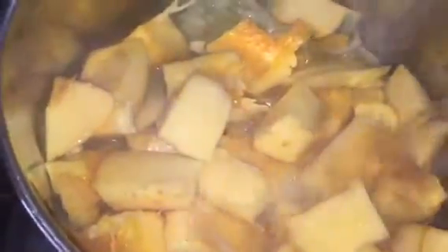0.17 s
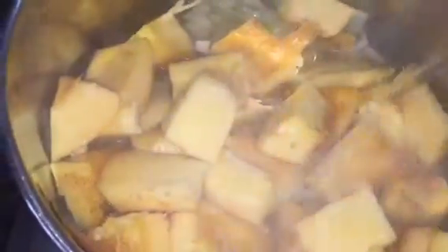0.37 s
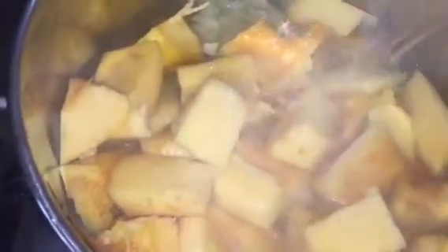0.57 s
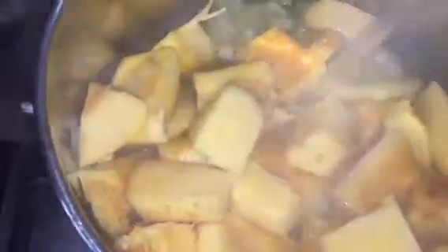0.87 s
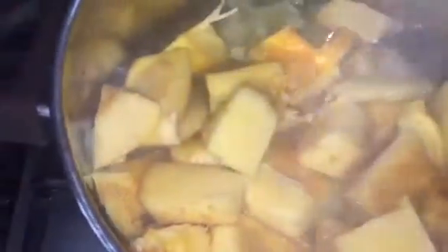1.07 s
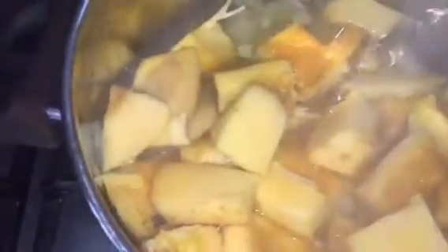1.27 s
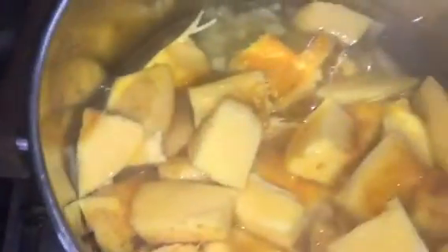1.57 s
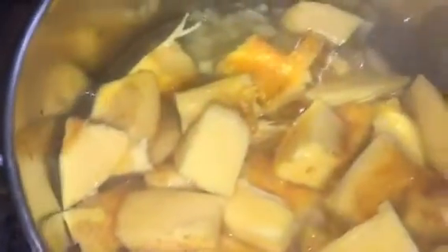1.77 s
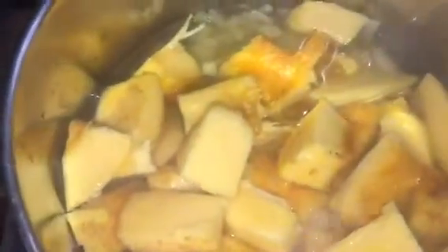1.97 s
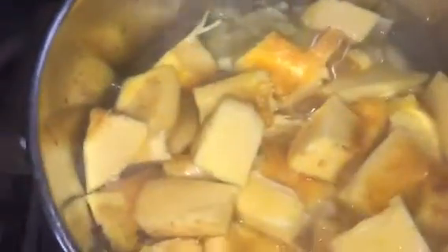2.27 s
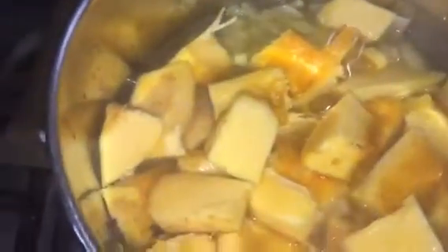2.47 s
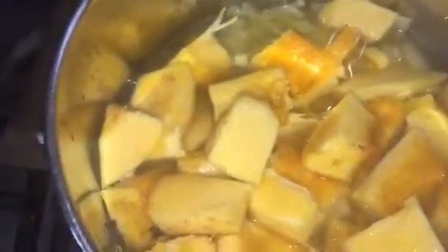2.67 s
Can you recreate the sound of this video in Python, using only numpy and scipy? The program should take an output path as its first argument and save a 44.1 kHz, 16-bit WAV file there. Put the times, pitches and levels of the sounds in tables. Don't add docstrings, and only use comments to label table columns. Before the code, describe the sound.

Hot water pours in a broken stream onto vegetables in a steel pot, crackling, spattering and plopping, then only drips; a kettle thuds down and knocks loudly on the counter. Close small microphone, quiet kitchen.

```python
import sys
import numpy as np
from scipy import signal
from scipy.fft import rfft, irfft
from scipy.io import wavfile

SR = 44100
rng = np.random.default_rng(int(sys.argv[2]) if len(sys.argv) > 2 else 0)


def how_loud(loudness_db):
    steps = np.asarray(loudness_db, float) / 20
    return 10 ** steps


def to_wav(s):
    ch = np.atleast_2d(s).T
    pcm = np.round(np.clip(ch, -1, 1) * 32767)
    wavfile.write(sys.argv[1], SR, pcm.astype(np.int16))


N = 123479
AGE_S = np.arange(2600) / SR

# time in seconds, crackle level in dB, gurgle relative to it in dB.
POUR_VIGOUR = [(0, -74.5, 11.5), (.03, -63, -10), (.08, -53.5, -1), (.15, -62, 1), (.18, -73.5, -3),
               (.215, -55.5, -14), (.26, -83, 9), (.31, -52.5, -13), (.42, -56, -4.5), (.57, -63.5, 1.5),
               (.64, -59, -2), (.70, -59.5, 7.5), (.75, -70.5, 22), (.80, -66, 6.5), (.94, -65, 10),
               (1.10, -49.5, 0.5), (1.165, -73.5, 11.5), (1.42, -81, -35), (1.55, -80, -32)]
# frequency in Hz, density in dB per Hz.
SPRAY_COLOUR = [(1500, 3.5), (2300, 6), (3800, -3.5), (5500, -20.5), (6600, -45.5), (8000, 3.5),
                (11000, 3.5), (16000, 8)]
# start in seconds, peak in dB, ring in Hz.
SNAP_EVENTS = [(0.0314, -41, 10700), (0.058, -38, 6100), (0.069, -34, 6440), (0.086, -32.5, 8440),
               (0.1341, -33, 6860), (0.3042, -34, 8060), (0.389, -23.5, 5660), (0.5292, -30, 6000),
               (0.609, -37, 6500), (0.624, -26, 6960), (0.6433, -23.5, 6950), (0.6658, -33, 5860),
               (0.6843, -25.5, 5050), (0.8074, -25.5, 6830), (0.8258, -32, 6200), (0.8448, -35, 5800),
               (0.857, -33, 5840), (0.8834, -30.5, 11300), (0.9093, -32.5, 6000), (0.9221, -26, 9300),
               (0.9562, -24, 8400), (0.981, -14, 9300), (0.9959, -20, 11400), (1.006, -41, 9000),
               (1.0225, -13.5, 10560), (1.054, -30.5, 4530), (1.072, -15, 9100), (1.089, -21, 11700),
               (1.102, -15.5, 8700), (1.116, -15.5, 9100)]
# start in seconds, peak
# in dB, ring in Hz.
SPATTER_EVENTS = [(.052, -37.5, 8350), (.063, -31.5, 8260), (.076, -37, 6200), (.125, -50, 7500),
                  (.192, -42, 8900), (.2019, -41, 8160), (.2129, -61, 5730), (.223, -38.5, 7400),
                  (.2778, -52, 6090), (.2907, -46, 5940), (.332, -44, 7000), (.3641, -58, 6470),
                  (.3775, -37, 6500), (.4105, -29.5, 6000), (.428, -51, 6500), (.4354, -34, 6600),
                  (.4499, -37, 6800), (.4668, -55, 6500), (.4893, -50, 6490), (.5077, -37, 12900),
                  (.5467, -32, 6360), (.5871, -38, 5460), (.5965, -37, 5500), (.7467, -45, 12800),
                  (.7801, -44, 13300), (.7956, -36, 11800), (.8964, -35, 8700), (.940, -32.5, 5000),
                  (.9487, -26, 9800), (1.003, -31, 10100), (1.017, -29, 9500), (1.0195, -20, 6500),
                  (1.035, -34, 4540), (1.040, -37.5, 4630), (1.084, -50, 9500), (1.097, -40, 14000),
                  (1.113, -23, 11700), (1.182, -31, 10500), (1.2277, -70, 6280), (1.241, -56, 4840),
                  (1.265, -53, 6000), (1.370, -52.5, 5430), (1.388, -47, 9100), (1.4433, -52, 13300),
                  (1.457, -62.5, 10000), (1.6019, -60, 4010), (1.756, -59, 2900), (1.805, -51, 5700),
                  (1.879, -44, 5070), (1.940, -56, 10050), (2.096, -59, 13000), (2.505, -44.5, 12500)]
# start in seconds, peak in dB, ring in Hz.
DRIP_EVENTS = [
    (1.1374, -19.5, 7650),
    (1.1787, -23.5, 7160),
    (1.273, -46.5, 13400),
    (1.379, -47, 9170),
    (1.566, -50.5, 11300),
    (1.8037, -52.5, 3180),
    (1.8716, -44, 6000),
    (1.874, -43, 4320),
    (1.9398, -53.5, 4400),
]
# start in seconds, peak in dB, ring in Hz.
TINK_EVENTS = [(0.0323, -40.5, 3350), (0.0571, -40.5, 1830), (0.205, -31, 2350), (0.214, -38, 1970),
               (0.223, -36.5, 2360), (0.3074, -42.5, 2420), (0.3232, -32, 2110), (0.388, -26, 2380),
               (0.7694, -35.5, 1820), (0.9816, -34, 2140), (0.9907, -26.5, 2410), (1.011, -31.5, 2270),
               (1.072, -25.5, 2230), (1.1184, -21.5, 2870)]
# start in seconds, peak in dB, ring in Hz.
PLOP_EVENTS = [(0.389, -32, 900), (0.608, -38, 1210), (0.667, -44, 1040), (0.687, -38, 1260),
               (0.753, -44.5, 1220), (0.808, -37, 1330), (0.896, -40.5, 1180), (0.95, -29.5, 944),
               (0.981, -20.5, 1286), (1.003, -30.5, 1230), (1.022, -24, 1270), (1.054, -23.5, 890),
               (1.089, -24, 1270), (1.105, -29.5, 1300), (1.115, -27.5, 1510)]
# frequency in Hz, level in dB, T60 in seconds.
POT_MODES = [(710, -12, .012), (1290, -7, .016), (2290, -11, .018), (3070, -14, .013), (4530, -18, .01)]
# start in seconds, peak in dB, boost of the high modes in dB.
CRACK_EVENTS = [
    (2.603, -5, 12.5),
    (2.6251, 0, 31),
    (2.6267, -3.5, -37),
    (2.6304, -2.5, 0.5),
    (2.638, -9.5, 5.5),
    (2.641, -23, 14),
    (2.679, -15, 3.5),
]
# frequency in Hz, level in dB, T60 in seconds.
KETTLE_MODES = [(2230, -11, 0.019), (2270, -2, 0.016), (2393, 15.5, 0.011), (2720, 9.5, 0.017),
                (3030, 3, 0.018), (3267, -5, 0.041), (5170, 6, 0.0057), (5540, 7, 0.0081),
                (6000, -2, 0.021), (6500, -10, 0.024), (8500, -1, 0.0086), (11600, -8, 0.014),
                (14000, 2, 0.0054)]
# start in seconds, level in dB, contact cut in Hz.
THUD_EVENTS = [
    (2.391, -25.5, 865),
    (2.402, -24.5, 620),
    (2.414, -21, 500),
    (2.445, -27.5, 446),
    (2.605, -25, 300),
    (2.625, -18.5, 520),
    (2.640, -18.5, 338),
    (2.688, -23.5, 235),
    (2.736, -30, 470),
    (2.762, -29, 355),
]
# frequency in Hz, level in dB, T60 in seconds.
COUNTER_MODES = [(128, -10, 0.043), (211, -11, 0.06), (261, -16, 0.06), (301, 0.5, 0.035), (449, -2, 0.038),
                 (626.5, -2.5, 0.052), (740, -35, 0.03)]
# time in seconds, level in dB.
SLIDE_LEVEL = [(2.47, -78.5), (2.495, -68), (2.51, -50), (2.56, -51.5), (2.602, -41.5), (2.61, -81)]
# frequency in Hz, density in dB per Hz.
SLIDE_SPECTRUM = [(500, -9.5), (1050, -9), (2300, -8.5), (3200, -23), (5000, -32.5), (9000, -28.5),
                  (11700, -33), (16000, -39)]
# start in seconds, peak
# in dB, frequency in Hz.
BUMP_EVENTS = [(0.576, -54.5, 66.5), (1.081, -50.5, 56), (1.127, -56, 59.5), (1.177, -56, 60.5),
               (1.618, -55.5, 79), (2.383, -22, 75.4), (2.459, -35.5, 110), (2.519, -39.5, 74),
               (2.6, -24.5, 73), (2.624, -21.5, 70), (2.675, -29, 109), (2.737, -30.5, 60)]
# frequency in Hz, T60 in seconds.
KITCHEN_T60 = [(60, 0.9), (300, 0.5), (1500, 0.44), (5000, 0.31), (14000, 0.29)]
# frequency in Hz, density in dB per Hz.
HUM_COLOUR = [(25, -8.5), (75, -1), (227, -10.5), (600, -15), (1100, -19), (2300, -19.5), (14000, -30),
              (16500, -31)]
# centre in Hz, width in Hz, level in dB.
WHISTLE_BANDS = [(2210, 340, -73), (4450, 300, -86.5), (645, 150, -78)]

CRACKLE_PER_S, SIZZLE_PER_S, GURGLE_PER_S = 2700, 900, 730
CRACKLE_DB, SIZZLE_DB, FIZZ_DB = 1, 3, -6.5
SNAP_SPAN, SPATTER_SPAN, DRIP_SPAN = (0.6, 2.2), (0.66, 2.03), (0.63, 1.67)
SNAP_SWELL_S, SNAP_T60_S = 0.0012, 0.0044
SNAP_RING_DB, SNAP_RING_CYCLES = -5, 44.4
SNAP_TAIL_DB, SNAP_TAIL_T60_S = -24, 0.045
TINK_CYCLES, PLOP_CYCLES = 32, 8
BUBBLE_RISE, BREATH_GAIN = 0.15, 0.63
POT_DELAY_S = 0.001058
BRIGHT_FROM_HZ = 4000
CRACK_NOISE_DB, CRACK_T60_S = -9, 0.0061
CRACK_WASH_DB, CRACK_WASH_T60_S = -3, 0.091
RATTLE_DB, RATTLE_T60_S, RATTLE_HZ = -6, 0.23, (780, 2560)
RATTLE_BRIGHT_DB = -29.5
SLOSH_DB, SLOSH_AT_S, SLOSH_WIDTH_S = -58, 1.052, 0.085
ROOM_WATER_DB, ROOM_KNOCK_DB, ROOM_GAP_S = -25, -10, 0.0072
HUM_DB = -67.5
HEADROOM = 0.88


def rms_one(x):
    return x / np.sqrt(np.mean(x ** 2) + 1e-20)


def peak_one(x):
    return x / np.abs(x).max()


def noise(size=N):
    return rng.standard_normal(size)


def in_time(rows):
    s, *columns = np.transpose(rows)
    return [np.interp(np.arange(N) / SR, s, c, left=-120, right=-120) for c in columns]


def at_hz(points, hz):
    points_hz, value = np.transpose(points)
    return np.interp(np.log(hz), np.log(points_hz), value)


def drift(rate_hz):
    r = np.exp(-80 * np.pi * rate_hz / SR)
    slow = signal.lfilter([1], [1, -2 * r, r * r], noise(N // 40 + 2002))[2000:]
    return np.interp(np.arange(N) / 40, np.arange(len(slow)), rms_one(slow))


def ring(clicks, hz, t60_s):
    r = how_loud(-60 / (t60_s * SR))
    w = 2 * np.pi * hz / SR
    return signal.lfilter([0, np.sin(w)], [1, -2 * r * np.cos(w), r * r], clicks + 1e-18)


def colour(x, spectrum):
    gain = how_loud(at_hz(spectrum, np.fft.rfftfreq(N, 1 / SR) + 1))
    return rms_one(irfft(rfft(x) * gain, N))


def band(x, low_hz, high_hz):
    edges_hz = [low_hz, min(high_hz, 0.45 * SR)]
    return signal.sosfilt(signal.butter(2, edges_hz, "band", fs=SR, output="sos"), x)


def add(out, start_s, burst):
    i = int(start_s * SR)
    out[i:i + len(burst)] += burst[:N - i]


def fade(t60_s):
    return how_loud(-60 * AGE_S / t60_s)


def grains(per_s, low_hz, high_hz, cycles, spread_db, count):
    sizes = how_loud(spread_db * np.minimum(rng.exponential(1, N), 5)) * rng.choice([-1, 1], N)
    clicks = sizes * (rng.random(N) < per_s / SR)
    dealt = rng.integers(0, count, N)
    out = np.zeros(N)
    for k, hz in enumerate(np.geomspace(low_hz, high_hz, count)):
        out += band(ring(clicks * (dealt == k), hz, cycles / hz), hz / 3.1, hz * 1.35)
    return rms_one(out)


def pour():
    level_db, gurgle_db = in_time(POUR_VIGOUR)
    clumps = how_loud(3.5 * drift(49))
    crackle = grains(CRACKLE_PER_S * clumps, 3110, 14200, cycles=7.3, spread_db=3.44, count=16)
    crackle = colour(crackle, SPRAY_COLOUR)
    sizzle = grains(SIZZLE_PER_S * clumps, 5900, 7000, cycles=50, spread_db=3.2, count=8)
    fizz = colour(noise(), SPRAY_COLOUR) * how_loud(3 * drift(80))
    gurgle_rate = GURGLE_PER_S * how_loud(5 * drift(30))
    gurgle = grains(gurgle_rate, 1050, 2600, cycles=17, spread_db=3, count=14)
    gurgle = band(gurgle, 350, 4100)
    spray = how_loud(CRACKLE_DB) * crackle + how_loud(SIZZLE_DB) * sizzle + how_loud(FIZZ_DB) * fizz
    return how_loud(level_db) * (spray + how_loud(gurgle_db) * gurgle)


def snaps(rows, span):
    low, high = span
    spit_fade = fade(SNAP_T60_S) + how_loud(SNAP_TAIL_DB) * fade(SNAP_TAIL_T60_S)
    swell = np.minimum(AGE_S / SNAP_SWELL_S, 1) ** 2
    out = np.zeros(N)
    for s, db, hz in rows:
        spit = band(noise(len(AGE_S)), low * hz, high * hz)
        spit = band(spit, 0.85 * low * hz, 1.3 * high * hz) * spit_fade
        tone = rms_one(band(noise(len(AGE_S)), 0.862 * hz, 1.05 * hz)) * fade(SNAP_RING_CYCLES / hz)
        add(out, s, how_loud(db) * peak_one((spit + how_loud(SNAP_RING_DB) * tone) * swell))
    return out


def bubbles(rows, cycles):
    out = np.zeros(N)
    for s, db, hz in rows:
        turns = hz * AGE_S * (1 + BUBBLE_RISE * hz * AGE_S / cycles)
        breath = rms_one(band(noise(len(AGE_S)), 0.61 * hz, 1.38 * hz))
        burst = np.sin(2 * np.pi * turns) + BREATH_GAIN * breath
        burst = burst * fade(cycles / hz) * np.minimum(AGE_S * hz, 1)
        add(out, s, how_loud(db) * peak_one(burst))
    return out


def pot():
    click = 1. * (AGE_S == 0)
    out = np.zeros(N)
    for s, db, _ in PLOP_EVENTS:
        body = np.zeros(len(AGE_S))
        for (hz, mode_db, t60_s), luck in zip(POT_MODES, noise(len(POT_MODES))):
            body += how_loud(mode_db + 3 * luck) * ring(click, hz * (1 + 0.048 * luck), t60_s)
        add(out, s + POT_DELAY_S, how_loud(db) * band(body, 370, 6300))
    return out


def cracks():
    click = 1. * (AGE_S == 0)
    out = np.zeros(N)
    for s, db, bright_db in CRACK_EVENTS:
        body = np.zeros(len(AGE_S))
        for (hz, mode_db, t60_s), luck in zip(KETTLE_MODES, noise(len(KETTLE_MODES))):
            body += how_loud(mode_db + 2.5 * luck + bright_db * (hz > BRIGHT_FROM_HZ)) * ring(click, hz, t60_s)
        body = peak_one(band(body, 1600, 9000))
        white = noise(len(AGE_S))
        spit = band(white, 3100, 9900) * fade(CRACK_T60_S)
        wash = band(white, 960, 3840) * fade(CRACK_WASH_T60_S)
        add(out, s, how_loud(db) * (body + how_loud(CRACK_NOISE_DB) * (spit + how_loud(CRACK_WASH_DB) * wash)))
    return out


def thuds():
    out = np.zeros(N)
    for s, db, cut_hz in THUD_EVENTS:
        push = np.zeros(SR // 2)
        push[0] = how_loud(db)
        push = signal.sosfilt(signal.butter(2, cut_hz, fs=SR, output="sos"), push)
        for (hz, mode_db, t60_s), luck in zip(COUNTER_MODES, noise(len(COUNTER_MODES))):
            add(out, s, how_loud(mode_db + 2 * luck) * ring(push, hz, t60_s))
    return out


def rattle():
    out = np.zeros(N)
    for s, db, cut_hz in THUD_EVENTS:
        white = noise(len(AGE_S))
        dull = band(band(white, *RATTLE_HZ), 230, RATTLE_HZ[1])
        bright = how_loud(RATTLE_BRIGHT_DB) * band(white, 4800, 8800)
        add(out, s, how_loud(db + RATTLE_DB) * cut_hz / 500 * (dull + bright) * fade(RATTLE_T60_S))
    return out


def slide():
    level_db, = in_time(SLIDE_LEVEL)
    return how_loud(level_db + 1.5 * drift(80)) * colour(noise(), SLIDE_SPECTRUM)


def bumps():
    swell = np.sin(np.pi * AGE_S / AGE_S[-1]) ** 2
    out = np.zeros(N)
    for s, db, hz in BUMP_EVENTS:
        add(out, s, how_loud(db) * np.sin(2 * np.pi * hz * AGE_S) * swell)
    return out


def slosh():
    swell = np.exp(-((np.arange(N) / SR - SLOSH_AT_S) / SLOSH_WIDTH_S) ** 2)
    return how_loud(SLOSH_DB + 7.3 * drift(48)) * rms_one(band(noise(), 190, 520)) * swell


def kitchen(x):
    t = np.arange(SR // 2) / SR
    edges_hz = 45 * 2 ** np.arange(0, 10.)
    tail = np.zeros(len(t))
    for low_hz, high_hz in zip(edges_hz, edges_hz[1:]):
        t60_s = at_hz(KITCHEN_T60, low_hz * 1.4)
        tail += band(noise(len(t)), low_hz, high_hz) * how_loud(-60 * t / t60_s)
    tail = tail * np.clip(t / ROOM_GAP_S, 0, 1)
    return signal.fftconvolve(x, tail / np.sqrt(np.sum(tail ** 2)))[:N]


def hum():
    out = how_loud(HUM_DB + 0.6 * drift(6)) * colour(noise(), HUM_COLOUR)
    for hz, width_hz, db in WHISTLE_BANDS:
        hiss = band(noise(), hz - width_hz / 2, hz + width_hz / 2)
        out += how_loud(db) * rms_one(band(hiss, hz - width_hz, hz + width_hz))
    return out


def scene():
    water = pour() + snaps(SNAP_EVENTS, SNAP_SPAN) + snaps(SPATTER_EVENTS, SPATTER_SPAN)
    water += snaps(DRIP_EVENTS, DRIP_SPAN)
    water += bubbles(TINK_EVENTS, TINK_CYCLES) + bubbles(PLOP_EVENTS, PLOP_CYCLES) + pot()
    knocks = cracks() + thuds() + rattle() + slide()
    room = kitchen(how_loud(ROOM_WATER_DB) * water + how_loud(ROOM_KNOCK_DB) * knocks)
    return (water + knocks + room + bumps() + slosh() + hum())[None]


def band_limit(x):
    return signal.sosfilt(signal.butter(12, 16990, fs=SR, output="sos"), x)


def record(dry):
    x = signal.sosfilt(signal.butter(3, 42, "high", fs=SR, output="sos"), dry)
    x = HEADROOM * np.tanh(x / HEADROOM)
    x = signal.sosfilt(signal.cheby2(10, 50, 16900, fs=SR, output="sos"), x)
    return band_limit(x)


dry = scene()
out = record(dry)
to_wav(out)
```